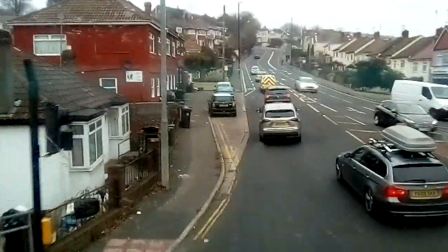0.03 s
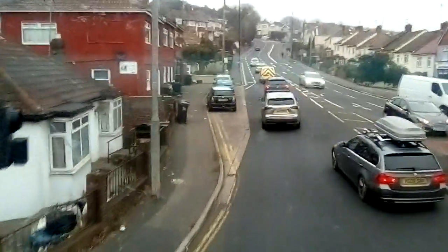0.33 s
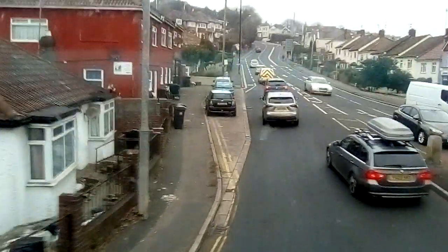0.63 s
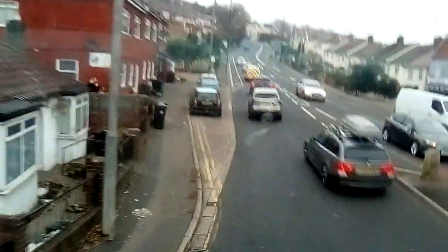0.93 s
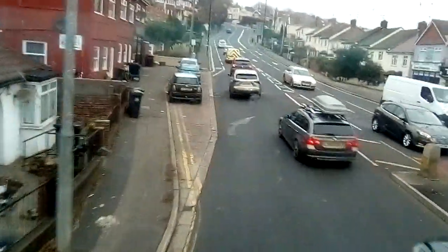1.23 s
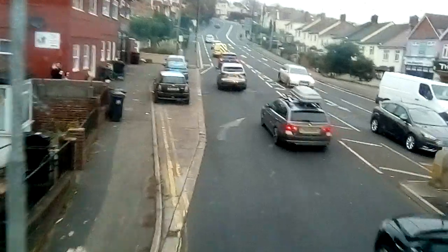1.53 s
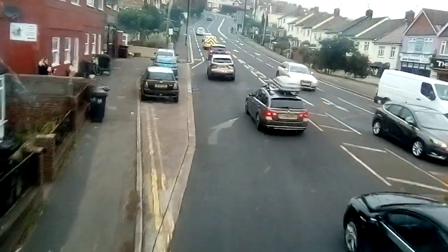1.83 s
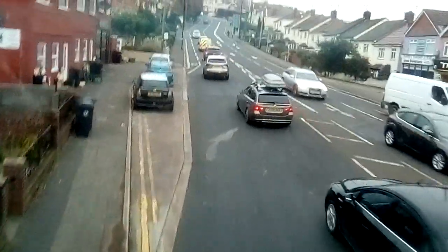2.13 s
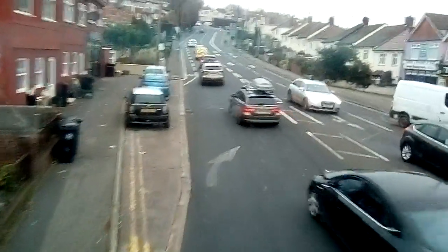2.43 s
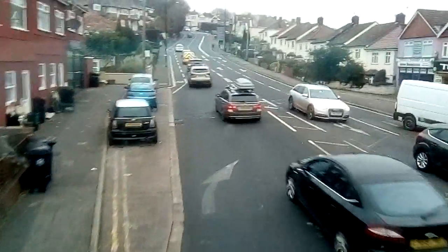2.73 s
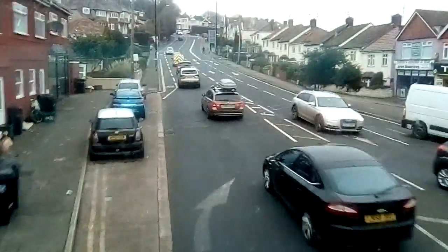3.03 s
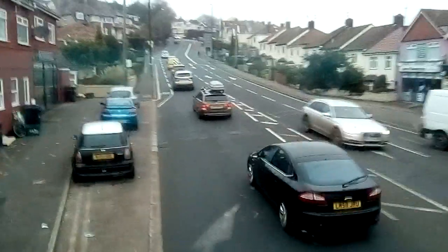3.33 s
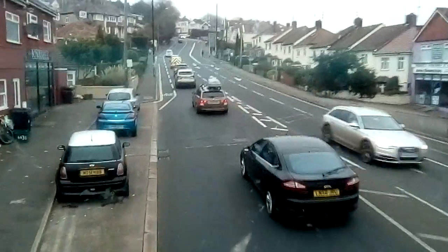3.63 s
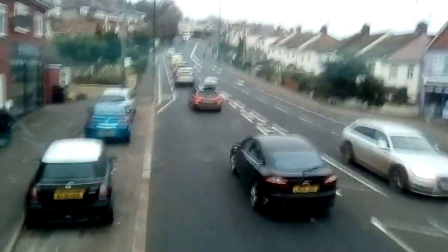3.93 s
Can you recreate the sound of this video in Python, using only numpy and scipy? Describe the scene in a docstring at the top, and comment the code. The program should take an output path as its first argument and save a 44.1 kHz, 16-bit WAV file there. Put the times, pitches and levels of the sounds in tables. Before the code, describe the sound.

A deep bus engine drone, heard inside the moving bus, sinks in a gear change, then climbs and booms. Road rumble runs underneath while loose trim knocks and rattles lightly, mostly on the left, with one sharp click.

```python
"""A deep engine drone fills a moving bus, sinks in a gear change, then climbs again and booms.
The engine's orders sweep through the cabin's resonances and beat against a driven accessory.
Road rumble, tyre roar and diesel clatter run underneath as bands of noise. Loose trim buzzes,
knocks, clicks and creaks, mostly on the left, with one short squeak."""
import sys
import numpy as np
from scipy import signal
from scipy.fft import rfft, irfft, next_fast_len
from scipy.io import wavfile
from scipy.ndimage import uniform_filter1d, minimum_filter1d, map_coordinates

SR = 44100
rng = np.random.default_rng(int(sys.argv[2]) if len(sys.argv) > 2 else 0)


def put_to_file(sound):
    """Save the sound as 16-bit audio at rate SR, in the file named by the first command-line argument."""
    columns = np.atleast_2d(sound).T  # one column per channel
    safe = np.clip(columns, -1, 1)
    whole_steps = np.round(safe * 32767)
    wavfile.write(sys.argv[1], SR, whole_steps.astype(np.int16))


N = 176400

# Levels are relative; each source adds its own gains.
# Road noise (time [s], rumble level [dB], roar level [dB])
ROAD_LEVELS = [(0, -30.5, -38), (.15, -27.5, -42), (.35, -28.5, -42.5), (.7, -30, -43.5), (1.1, -29.5, -44),
               (1.4, -25, -38), (1.75, -25, -38), (2.3, -26, -39), (2.7, -24.5, -37), (3.15, -22.5, -39),
               (3.6, -25, -40.5), (4, -22.5, -38)]
# Jolts from the road (time [s], level [dB])
ROAD_JOLTS = [(3.212, -33.5), (3.861, -31)]
# Noise spectra of the background (frequency [Hz], level [dB])
RUMBLE_SPECTRUM = [(12, -10.5), (22, -2), (40, -7.5), (65, -1), (85, 3), (120, 4), (142, -6.5), (175, -6.5),
                   (225, -15.5), (330, -25.5), (600, -73.5), (1500, -120)]
ROAR_SPECTRUM = [(140, -25.5), (230, -6), (302, -9), (376, -4), (408, -11.5), (482, -5), (565, -7),
                 (614, -12), (704, -9.5), (825, -14.5), (1050, -15.5), (1280, -26), (1400, -29),
                 (1820, -52.5), (3080, -120)]
AIR_SPECTRUM = [(60, -31), (180, -14), (300, 2), (450, 9.5), (560, -7), (800, -13), (1400, -42.5),
                (4000, -120)]
JOLT_SPECTRUM = [(90, -23), (160, 0.5), (210, 6.5), (260, -5), (400, -19), (800, -60), (2000, -120)]

# Noise spectra of the trim and the diesel clatter (frequency [Hz], level [dB])
BUZZ_SPECTRUM = [(1500, -20), (3300, 0), (5000, -1), (6400, 0), (7200, -8), (8400, -18), (11000, -18),
                 (13800, -18), (15000, -9)]
PANEL_SPECTRUM = [(600, -29.5), (1200, 2.5), (1750, 3.5), (2300, 1), (3000, -3.5), (4000, -12.5),
                  (6000, -19.5), (8500, -43.5)]
FITTING_SPECTRUM = [(1500, -12), (3000, 0), (4500, -1), (6400, 1), (7500, -7), (9000, -19), (15000, -25)]
SNAP_SPECTRUM = [(1500, -10), (3400, 2), (5500, 0), (7500, -5), (11000, -12), (15000, -3)]
TICK_SPECTRUM = [(1200, -8), (2300, 1.5), (3400, 1.5), (4400, -13), (5500, -9), (6800, -22), (10000, -39)]
SQUEAK_SPECTRUM = [(1500, -60), (3500, -22), (5200, -9), (6150, 0), (6800, -5), (7600, -19), (9000, -40),
                   (15000, -60)]
CLATTER_SPECTRUM = [(700, -19), (1250, -6), (1750, -1.5), (2400, -7.5), (2950, -10), (3600, -19.5),
                    (5000, -37), (9000, -77.5)]
# Sustained treble (time [s], diesel clatter level [dB], trim buzz level [dB])
TREBLE_LEVELS = [(0.0, -53.5, -69.5), (0.21, -54.5, -65), (0.47, -56.5, -70.5), (0.71, -57, -69),
                 (0.87, -53.5, -69), (1.17, -55, -69), (1.53, -52, -66), (1.89, -52.5, -64.5),
                 (2.16, -51, -64), (2.28, -53.5, -65.5), (2.83, -52.5, -67.5), (3.23, -54.5, -67.5),
                 (3.61, -52, -64), (4.0, -54, -65)]
# Impacts of panels and loose fittings (time [s], level [dB], decay time [s])
PANEL_KNOCKS = [(.038, -38, .022), (.087, -39, 0.018), (0.26, -40.5, 0.0071), (2.016, -37.5, .012),
                (2.21, -43, 0.0091), (2.524, -43.5, 0.016), (3.19, -46, 0.044), (3.968, -41.5, 0.023)]
FITTING_RATTLES = [(0.802, -57.5, 0.033), (0.979, -59, 0.021), (1.446, -53.5, 0.024), (1.67, -54.5, 0.046),
                   (2.45, -55.5, 0.013), (2.528, -52, 0.021), (2.616, -57.5, 0.045), (3.296, -54.5, 0.032),
                   (3.478, -50.5, 0.027), (3.716, -51.5, 0.029)]
# Strikes of a catch (time [s], ring level [dB], snap level [dB])
CATCH_CLICKS = [(1.6535, -31, -36), (1.6637, -22, -38)]
# Its modes (frequency [Hz], level [dB], time to fall 60 dB [s])
CATCH_MODES = [(1620, -3, .014), (1830, 0, .016), (2150, -7, .012), (2780, -1, .018), (3360, -14, .028),
               (5980, -33, .18), (6170, -33, .18)]
# Rubbing panels (time [s], pitch [Hz], level [dB])
PANEL_CREAKS = [(.18, 1060, -48), (.238, 1070, -48), (.266, 1830, -46), (.362, 1060, -47), (1.62, 970, -47)]

# Engine speed and boom (time [s], firing rate [Hz], boom level [dB])
ENGINE_RUN = [(0, 61, -25), (.22, 37, -30), (.42, 33.7, -39), (.8, 30.6, -42), (1.02, 32, -39),
              (1.2, 46, -24.5), (1.37, 54, -17.3), (1.62, 59.8, -16.5), (1.85, 62.4, -15), (2.2, 65.5, -23),
              (2.5, 66.5, -25), (2.82, 66.8, -26), (3.03, 62.8, -16), (3.25, 60.3, -14.8),
              (3.6, 59.6, -14.8), (3.8, 56.9, -16), (4, 54.5, -21)]
# Partials of each shaft (multiple of the firing rate or accessory speed [1], level [dB])
ENGINE_ORDERS = [(.5, -46), (1, -31), (1.33, -38), (1.5, -34), (1.83, -35), (2.5, -42), (3, -35), (4, -48),
                 (5, -49), (6, -51), (8, -50), (12, -53)]
ACCESSORY_ORDERS = [(1, -33), (1.5, -34), (2, -28.5), (3, -37), (4, -43), (5, -50), (6, -53), (8, -53)]
# Swell of each set of partials (time [s], gain [dB])
ENGINE_LOAD = [(0, 2), (.3, -5.5), (1.1, 2.5), (1.4, -1), (2.7, -0.5), (3.2, -5), (4, 1.5)]
ACCESSORY_GAIN = [(0, 2.5), (.4, -10.5), (1.1, -5.5), (1.5, -5), (2, -2.5), (2.4, 0), (2.8, -3),
                  (3.1, -2.5), (4, -6)]
# Cabin resonances (frequency [Hz], gain [dB])
CABIN_RESPONSE = [(25, -4.5), (36, -8.5), (48, 2.5), (60, -2), (75, -5), (97, 7), (122, 5.5), (142, -11),
                  (170, -1), (200, -5), (300, -4), (430, 2.5), (700, -3.5)]
# Likeness of the noise at the two ears (frequency [Hz], correlation [1])
EAR_CORRELATION = [(130, 0.99), (250, 0.77), (500, 0.56), (1000, 0.086), (2000, 0.12), (6000, 0.062),
                   (12000, 0.15)]
# Stereo balance (frequency [Hz], left over right [dB])
LEFT_BIAS = [(50, -0.9), (250, -1.1), (500, -0.6), (1000, 2.5), (1900, 9), (3000, 4.5), (5000, 3.5),
             (8000, 1)]

TIME = np.arange(N) / SR


def amp(db):
    """Amplitude grows tenfold for every 20 dB."""
    return 10 ** (np.asarray(db) / 20)


def unit_rms(x):
    """Normalisation to a mean power of one."""
    return x / np.sqrt(np.mean(x ** 2) + 1e-20)


def at_frequency(points, hz):
    """Interpolation on a logarithmic frequency axis."""
    knots_hz, values = np.transpose(points)
    return np.interp(np.log(hz + 1), np.log(knots_hz + 1), values)


def curves(rows):
    """Linear interpolation in time, one curve for each column after the first."""
    times, *columns = np.transpose(rows)
    return [np.interp(TIME, times, column) for column in columns]


def wobble(knots_per_s):
    """Smooth random modulation: a spline through Gaussian values."""
    return map_coordinates(rng.standard_normal(1024), [TIME * knots_per_s], mode="wrap")


def filtered(x, response):
    """Linear filtering multiplies the spectrum by a frequency response."""
    size = next_fast_len(N + SR // 2)
    return irfft(rfft(x, size) * response(np.fft.rfftfreq(size, 1 / SR)), size)[..., :N]


def cabin_noise(spectrum, patchy_db=0):
    """Partial coherence: the sum and difference of two independent noises feed the two ears."""
    def mid_side_response(hz):
        angle = np.arccos(np.clip(at_frequency(EAR_CORRELATION, hz), -1, 1)) / 2
        return amp(at_frequency(spectrum, hz)) * [np.cos(angle), np.sin(angle)]

    white = signal.stft(rng.standard_normal((2, N)), nperseg=512)[2]
    patches = uniform_filter1d(rng.standard_normal(white.shape[1:]), size=5, axis=0)  # in frequency
    patches = uniform_filter1d(patches, size=12, axis=1)  # in time
    grainy = signal.istft(white * amp(patchy_db * unit_rms(patches)), nperseg=512)[1][:, :N]
    mid, side = filtered(grainy, mid_side_response)
    return unit_rms(np.array([mid + side, mid - side]))


def burst(start, attack_s, decay_s):
    """A damped vibration builds quickly and decays exponentially."""
    age = np.maximum(TIME - start, 0)
    return (1 - np.exp(-age / attack_s)) * np.exp(-age / decay_s)


def swell(centre_s, width_s):
    """A Gaussian envelope rises and falls symmetrically."""
    return np.exp(-.5 * ((TIME - centre_s) / width_s) ** 2)


def road():
    """Random excitation gives broad spectra: body rumble, tyre roar, steady air noise and dull jolts."""
    rumble_db, roar_db = curves(ROAD_LEVELS)
    rumble = amp(rumble_db + 1.5) * cabin_noise(RUMBLE_SPECTRUM)
    roar = amp(roar_db + .74 + .9 * wobble(14)) * cabin_noise(ROAR_SPECTRUM, patchy_db=1.82)
    air = amp(-48) * cabin_noise(AIR_SPECTRUM)
    jolts = sum(amp(db) * burst(start, attack_s=.013, decay_s=.51) for start, db in ROAD_JOLTS)
    return rumble + roar + air + jolts * cabin_noise(JOLT_SPECTRUM)


def trim_buzz():
    """Forced vibration: shaken trim gives a grainy, flickering buzz."""
    _, buzz_db = curves(TREBLE_LEVELS)
    flicker_db = .71 * wobble(25) + .73 * wobble(220)
    return amp(buzz_db + 3.5 + flicker_db) * cabin_noise(BUZZ_SPECTRUM, patchy_db=1.9)


def rattles(impacts, spectrum, attack_s, rough_db, rough_per_s):
    """Impact excitation: panels and loose fittings answer with rough, damped bursts of noise."""
    envelope = sum(amp(db) * burst(start, attack_s, decay_s) for start, db, decay_s in impacts)
    return envelope * amp(rough_db * wobble(rough_per_s)) * cabin_noise(spectrum)


def catch_clicks():
    """Free vibration: a loose catch snaps, then each mode rings down at its own rate."""
    clicks = np.zeros((2, N))
    snap = cabin_noise(SNAP_SPECTRUM)
    for start, ring_db, snap_db in CATCH_CLICKS:
        age = np.maximum(TIME - start, 0)
        for hz, db, t60 in CATCH_MODES:
            ring = np.sin(2 * np.pi * hz * age + rng.uniform(0, 2 * np.pi, (2, 1)))
            clicks += amp(ring_db + db) * burst(start, attack_s=.002, decay_s=t60 / np.log(1000)) * ring
        clicks += amp(snap_db) * burst(start, attack_s=.0003, decay_s=.002) * snap
    return clicks


def trim_tick():
    """Heavy damping leaves one dry tick of plastic trim."""
    return amp(-31) * burst(start=.3935, attack_s=.0005, decay_s=.0016) * cabin_noise(TICK_SPECTRUM)


def panel_creaks():
    """Friction between panels gives short tones that waver by phase modulation."""
    creaks = np.zeros(N)
    for centre_s, hz, db in PANEL_CREAKS:
        phase = 2 * np.pi * hz * TIME + 1.1 * wobble(250)
        creaks += amp(db) * swell(centre_s, width_s=.007) * np.sin(phase)
    return np.sqrt(2) * creaks


def trim_squeak():
    """Friction in the trim excites a high band of noise: one brief, hissy squeak."""
    return amp(-50) * swell(centre_s=2.056, width_s=.017) * cabin_noise(SQUEAK_SPECTRUM)


def firing():
    """The firing rate [Hz] and its time integral, the phase [rad]."""
    hz, _ = curves(ENGINE_RUN)
    return hz, 2 * np.pi * np.cumsum(hz) / SR


def diesel_clatter():
    """Amplitude modulation: the diesel's noise pulses gently at the firing rate."""
    clatter_db, _ = curves(TREBLE_LEVELS)
    _, phase = firing()
    pulse_db = .47 * np.cos(phase) + .37 * wobble(130)
    return amp(clatter_db + 2 + pulse_db) * cabin_noise(CLATTER_SPECTRUM, patchy_db=1.2)


def shaft_drone(orders, speed_ratio, flutter_db, drift_rad):
    """Resonance: a shaft's unsteady orders swell as they sweep through the cabin's peaks."""
    firing_hz, firing_phase = firing()
    drone = np.zeros(N)
    for order, db in orders:
        multiple = order * speed_ratio
        level_db = db + at_frequency(CABIN_RESPONSE, multiple * firing_hz) + flutter_db * wobble(12)
        phase = multiple * firing_phase + drift_rad * wobble(8) + rng.uniform(0, 2 * np.pi)
        drone += amp(level_db) * np.sin(phase)
    return np.sqrt(2) * drone


def accessory():
    """Beating: driven just below the firing rate, the accessory sounds close to the engine's tones."""
    gain_db, = curves(ACCESSORY_GAIN)
    return amp(gain_db) * shaft_drone(ACCESSORY_ORDERS, speed_ratio=.9, flutter_db=2, drift_rad=.44)


def engine():
    """Periodic forcing: a boom at twice the firing rate, over weaker orders that follow the load."""
    _, boom_db = curves(ENGINE_RUN)
    load_db, = curves(ENGINE_LOAD)
    _, phase = firing()
    boom = np.sqrt(2) * amp(boom_db + .2 + .86 * wobble(7.1)) * np.sin(2 * phase)
    orders = shaft_drone(ENGINE_ORDERS, speed_ratio=1, flutter_db=1.5, drift_rad=.35)
    return boom + amp(load_db) * orders


def scene():
    """Superposition: the sources add in the cabin, with the treble stronger on the left."""
    sustained = engine() + accessory() + road() + diesel_clatter() + trim_buzz()
    panels = rattles(PANEL_KNOCKS, PANEL_SPECTRUM, attack_s=.002, rough_db=1.8, rough_per_s=400)
    fittings = rattles(FITTING_RATTLES, FITTING_SPECTRUM, attack_s=.0059, rough_db=2.5, rough_per_s=300)
    cabin = sustained + panels + fittings + catch_clicks() + trim_tick() + panel_creaks() + trim_squeak()
    return filtered(cabin, lambda hz: amp(np.outer([.5, -.5], at_frequency(LEFT_BIAS, hz))))


def record(dry):
    """Peak limiting holds down the boom; a low-pass filter bounds the bandwidth."""
    ceiling_db, hold_s, fade_s, cutoff_hz = -7.2, .03, .002, 15550
    hold = int(hold_s * SR)
    needed_gain = np.minimum(1, amp(ceiling_db) / (np.abs(dry).max(axis=0) + 1e-9))
    gain = uniform_filter1d(minimum_filter1d(needed_gain, size=hold), size=hold)
    edge_fade = np.minimum(1, np.minimum(TIME, TIME[::-1]) / fade_s)
    return filtered(dry * gain * edge_fade, lambda hz: hz < cutoff_hz)


dry = scene()
out = record(dry)
put_to_file(out)
```